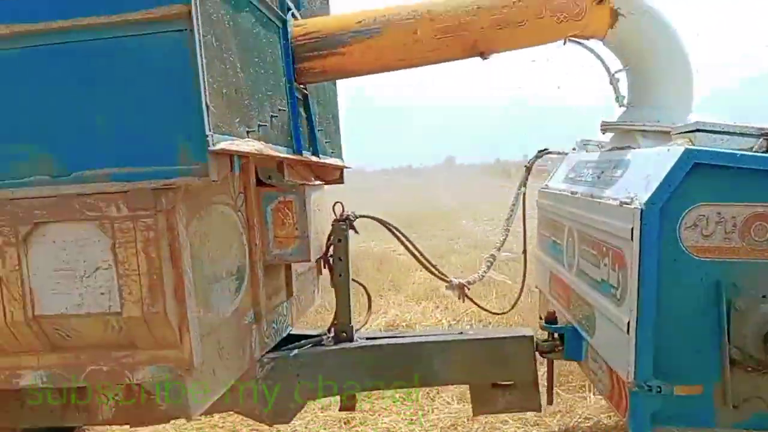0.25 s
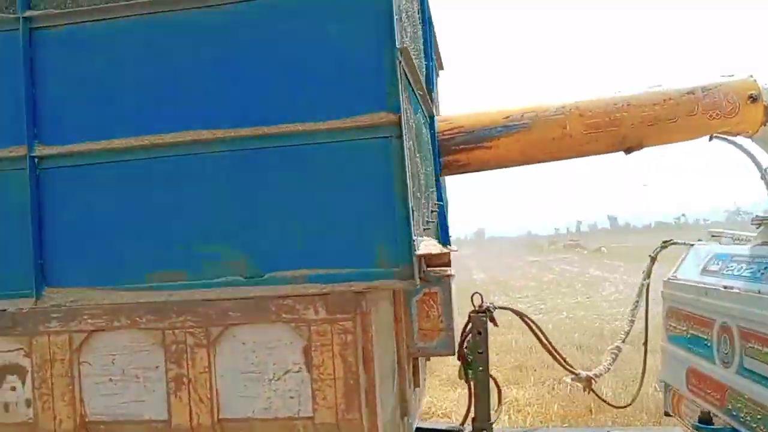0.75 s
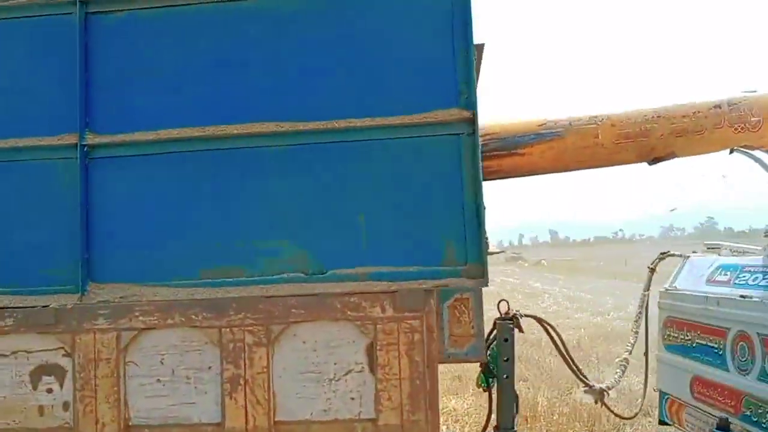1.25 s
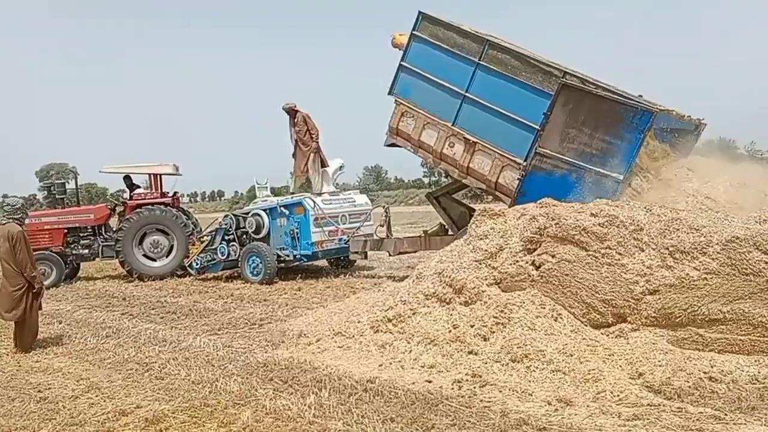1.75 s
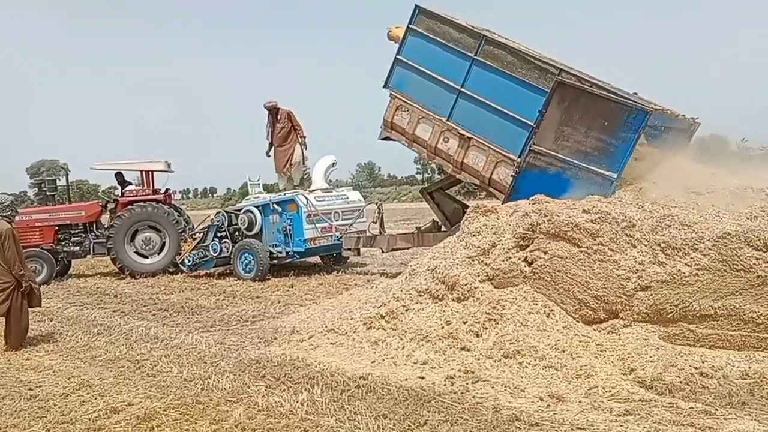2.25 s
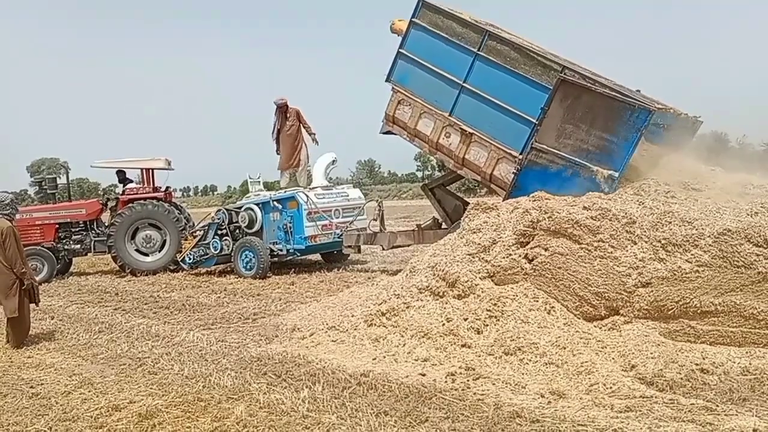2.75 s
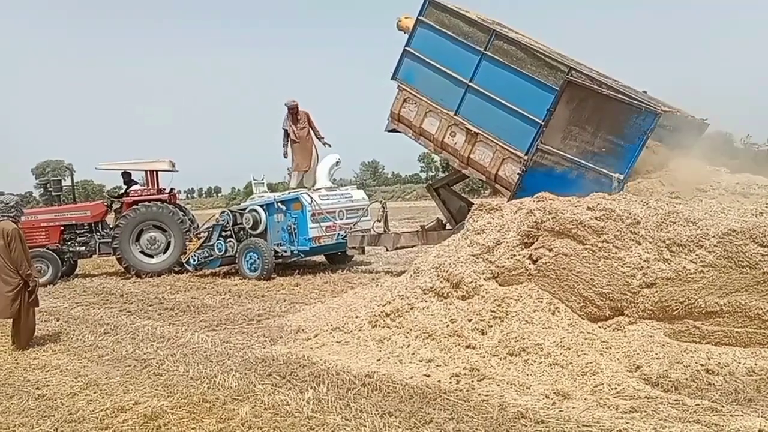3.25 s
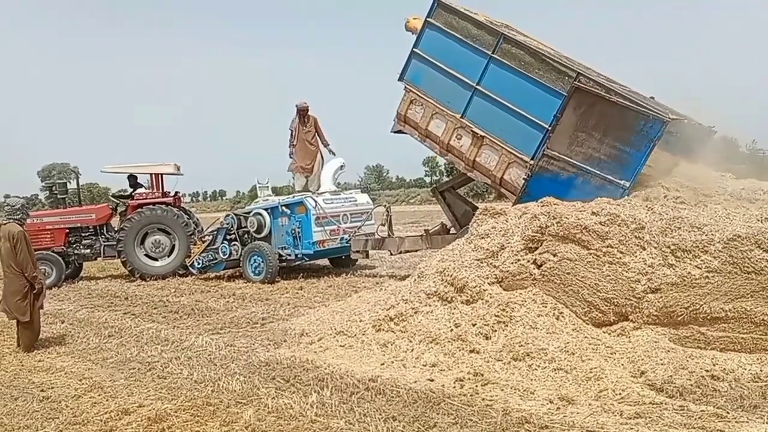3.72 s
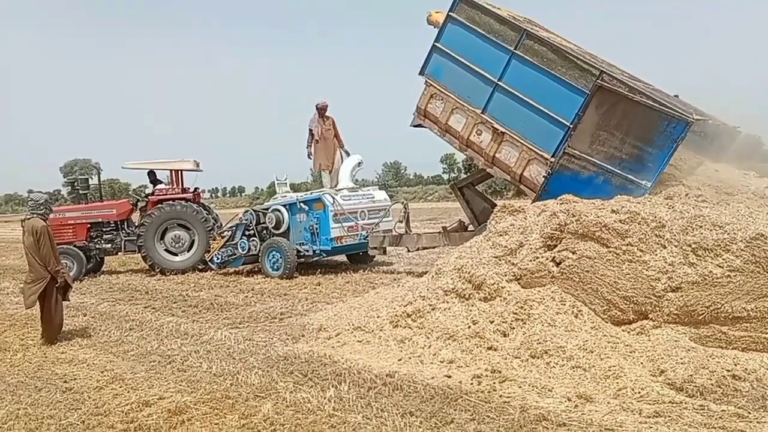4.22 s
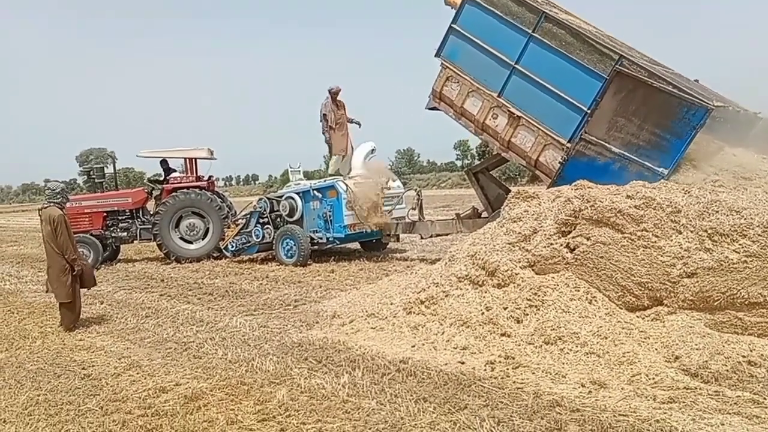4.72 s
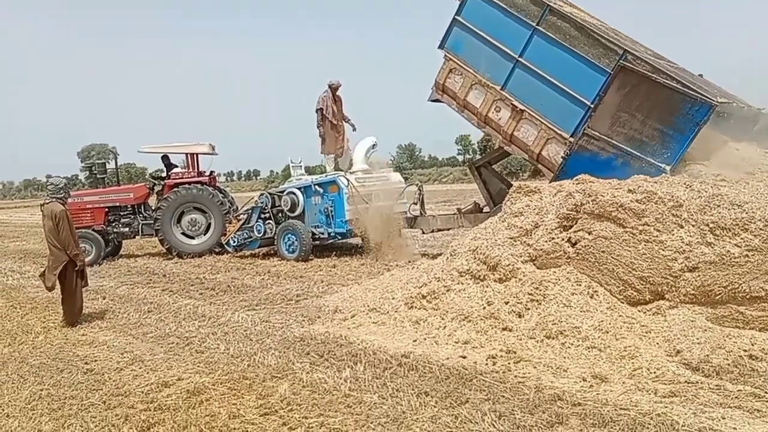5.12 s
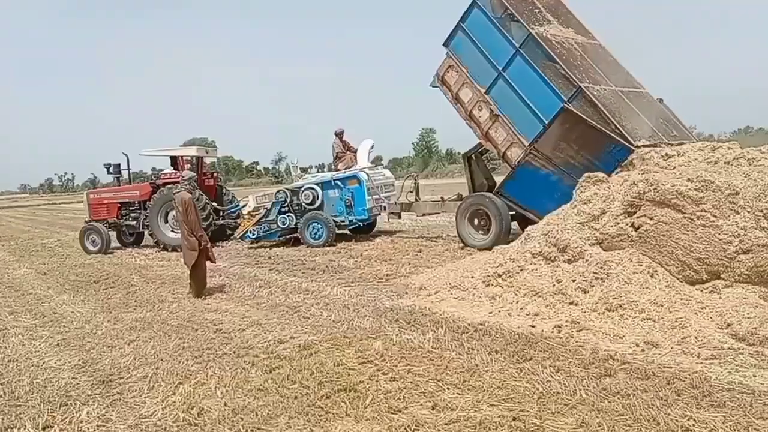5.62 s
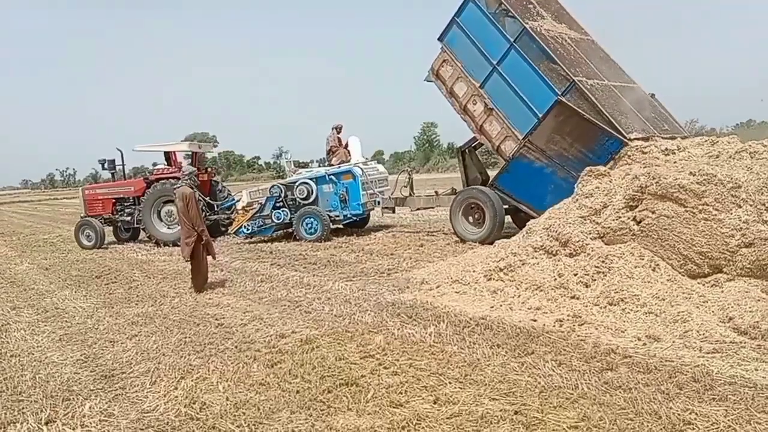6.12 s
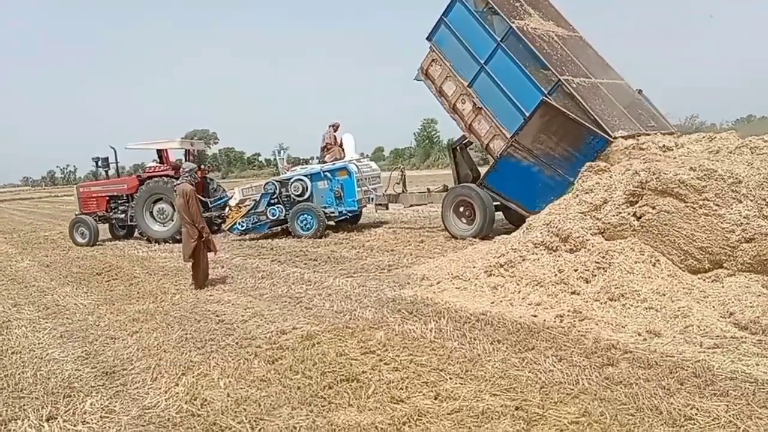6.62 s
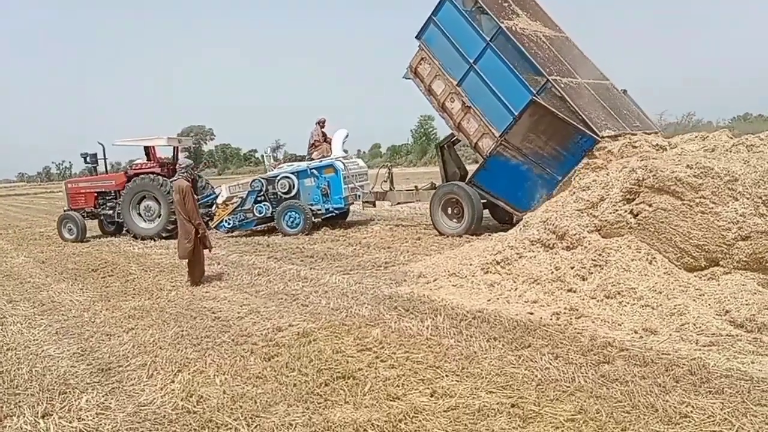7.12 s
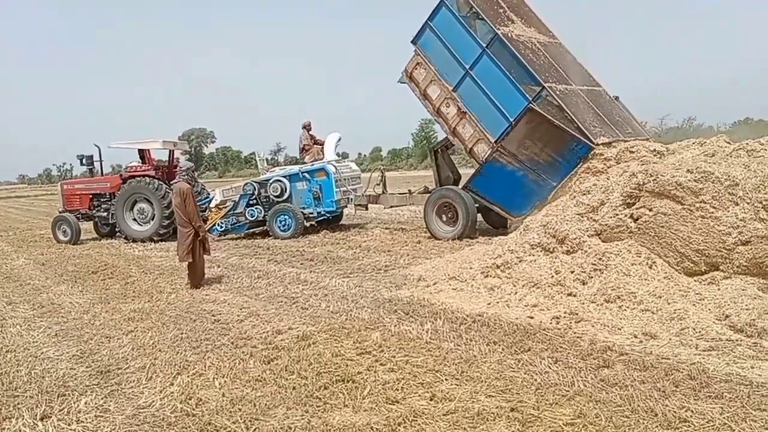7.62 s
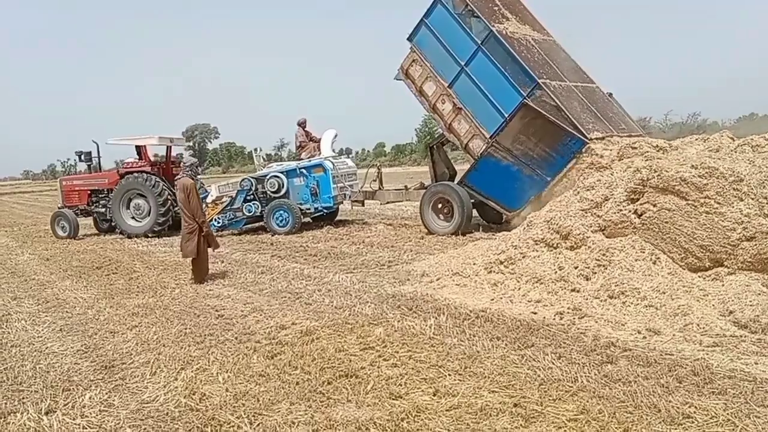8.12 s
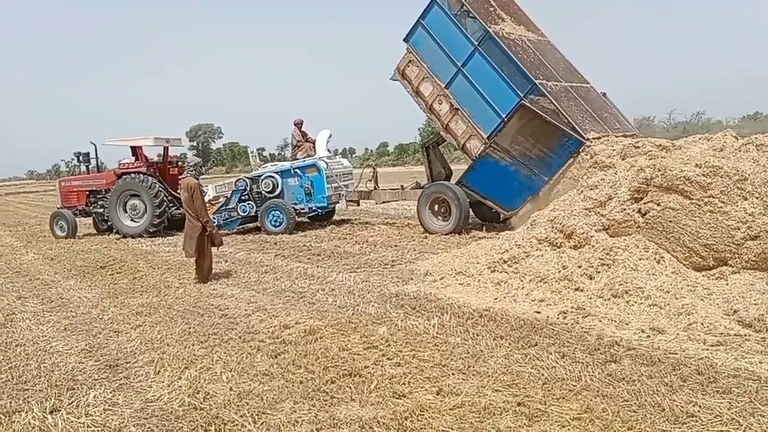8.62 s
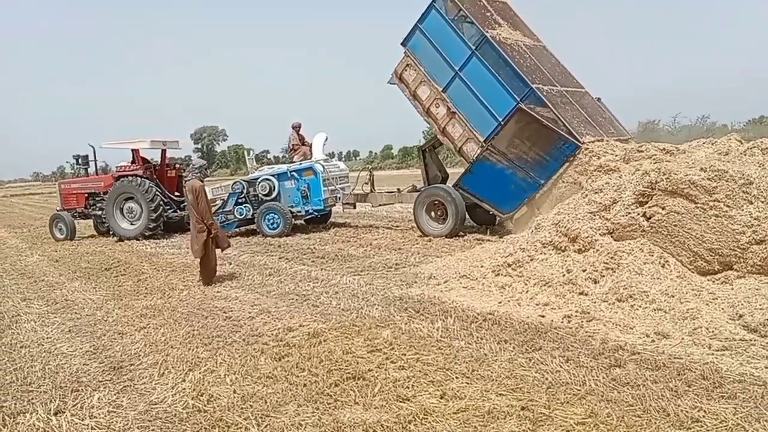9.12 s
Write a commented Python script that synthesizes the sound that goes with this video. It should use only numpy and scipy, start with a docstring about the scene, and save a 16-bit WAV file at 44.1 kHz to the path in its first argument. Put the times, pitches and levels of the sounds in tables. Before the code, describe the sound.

A tractor-driven straw chopper roars close by, then the diesel engine revs across a field with hissing chaff and drops to a distant knocking idle.

```python
"""In a stubble field, a four-cylinder diesel tractor drives a straw chopper, heard from three spots in turn.
Beside the chopper, its drum and blower roar over the engine's drone. From across the field, the engine
is revved three times while chaff hisses out. From further off, it sinks to a knocking idle, and close by
straw rustles and snaps and the breeze puffs. Each firing of a cylinder is a burst of noise; the echo
from the ground cancels some pitches and makes the distant tractor sound hollow."""
import sys
import numpy as np
from scipy import signal
from scipy.fft import rfft, irfft, next_fast_len
from scipy.io import wavfile
from scipy.ndimage import uniform_filter1d, map_coordinates

SR = 44100
rng = np.random.default_rng(int(sys.argv[2]) if len(sys.argv) > 2 else 0)


def int16_out(signal):
    """Quantize to a 16-bit WAV file."""
    q = np.round(np.clip(np.atleast_2d(signal).T, -1, 1) * 32767)
    wavfile.write(sys.argv[1], SR, q.astype(np.int16))


N = 412323

BESIDE_S, REVVING_S, IDLING_S = (0, 1.459), (1.504, 5.622), (5.622, 9.36)  # start and end at each spot
BESIDE_HZ, CRUISE_HZ, IDLE_HZ = 41.3, 75.83, 32  # firing rate: how many cylinders fire each second

# A "colour" says how strong the low and high pitches are compared with each other.
# roar of the drum and blower: f/Hz, level/dB
ROAR_COLOUR = [(38, -32), (57, -20), (82, -6.5), (220, -4), (290, 0.5), (480, -10), (650, 2), (780, -2.5),
               (900, -6.5), (1480, -9.5), (3420, -21.5), (7320, -22.5), (9300, -44.5), (15000, -41.5)]
# ringing of the sheet-metal housing: f/Hz, half width/Hz, level/dB
HOUSING_RINGS = [(2480, 170, 1.5), (4420, 66, 6.5), (6760, 130, 3.5)]
# drone of the exhaust and drive: multiple of the firing rate, level/dB
DRONE_TONES = [(2, -12), (4, -16), (4.43, -18.5), (6, -15.5), (8.14, -20), (12, -29), (14, -22),
               (15.5, -18), (19, -15.5)]

# each time the throttle opens: t/s, coasting before/s, pick-up time/s, overshoot/Hz, load (0 to 1)
THROTTLE_OPENINGS = [(1.35, 0.103, .26, .9, 0), (2.125, .23, .2, 1.9, 0.66), (3.03, .38, .26, .9, 1),
                     (5.03, .33, .27, 1.91, 0.65)]
# rows for rumble, clatter, hiss: level/dB at full speed, rise/dB per Hz of firing rate, load boost/dB
REVVING_LOUDNESS = [(-24, 0.3, .8), (-17.5, 0.34, 4), (-34.5, .35, 3)]
# diesel knock while revving: f/Hz, level/dB
REVVING_KNOCK_COLOUR = [(300, -6), (1200, -2), (2300, 5.5), (3500, -2), (5500, 2.5), (8000, 5.5),
                        (14000, -5.5)]
# the tractor from across the field: f/Hz, level/dB
REVVING_ENGINE_COLOUR = [(30, -41.5), (70, -27.5), (100, -22), (160, -6.5), (215, -9), (300, -11),
                         (480, -15), (950, -2), (1300, -0.5), (2200, -5.5), (3600, -14.5), (7700, -29),
                         (9300, -44), (15000, -52.5)]
# pitches that the ground echo cancels there: f/Hz, half width/Hz, level/dB
REVVING_ECHO_DIPS = [(691, 130, -16), (1760, 294, -14), (2720, 413, -5.5), (4510, 486, -8),
                     (6000, 310, -10.5)]
# note of the exhaust: multiple of the firing rate, level/dB
EXHAUST_TONES = [(1.001, -20), (1.499, -22), (1.75, -19), (2, -11.5), (2.249, -12.5), (3, -11.5),
                 (3.75, -20.5), (5.501, -25), (7, -23)]
# hum of the blower: multiple of the rate at which its blades pass, level/dB
BLOWER_TONES = [(1, -4.5), (4 / 3, -18), (2, -16.5)]
# whine of the gears: multiple of the firing rate, level/dB
GEAR_TONES = [(12.5, -15.5), (13, -16.5), (14.5, -18.5), (15, -21), (15.75, -23.5), (16, -8), (16.5, -19),
              (18, -20), (28, -14.5), (36.5, -25), (44.5, -21)]
# rasp of burning fuel: f/Hz, level/dB
FUEL_RASP_COLOUR = [(700, -31), (1300, 9), (1750, -17), (2350, 3), (3100, -12.5), (4400, -18), (6200, -24),
                    (8000, -6.5), (9300, -33), (15000, -45)]
# chaff leaving the blower: f/Hz, level/dB
CHAFF_COLOUR = [(1700, -23.5), (2400, 6), (2950, 2.5), (3600, 7), (4400, -24), (6100, -17), (6700, -2),
                (7600, -6), (8500, -13), (9400, -27), (15000, -30)]

# the engine slowing to idle: t/s, firing rate/Hz
IDLING_SPEED = [(5.62, 42.55), (5.8, 44.37), (6.0, 42.91), (6.35, 40.34), (6.75, 41.51), (7.05, 41.02),
                (7.25, 38.84), (7.65, 33.28), (7.9, 31.88), (8.33, 33.81), (8.86, 31.3), (9.35, 32.39)]
# rows for rumble, clatter, hiss: level/dB at idle, rise/dB per Hz of firing rate, load boost/dB
IDLING_LOUDNESS = [(-51.5, 1.0, 1.5), (-33.5, 0.416, 1.5), (-47.5, 0.4247, 1.8)]
# diesel knock, fuel injector ticks and exhaust puffs at low speed: f/Hz, level/dB
IDLING_KNOCK_COLOUR = [(300, -8), (1200, -6), (2600, -1), (3800, 1), (5000, -5.5), (9000, -3)]
TICK_COLOUR = [(1000, -12.5), (3500, -7.5), (5500, -6), (9000, 2.5), (14000, 1.5)]
PUFF_COLOUR = [(30, -16), (70, -10), (170, 1), (260, -12.5), (600, -30), (2000, -74)]
# ringing of the engine block: f/Hz, half width/Hz, level/dB
BLOCK_RINGS = [(984, 54, 4), (2730, 73, 2.5), (3610, 260, 2), (4710, 84, 4), (5660, 130, 2.5),
               (6740, 220, 6), (7740, 120, 5), (8470, 120, 6)]
# the tractor from further off: f/Hz, level/dB
IDLING_ENGINE_COLOUR = [(30, -40), (75, -17), (200, -24), (320, -12), (450, -15), (950, -7), (1400, -4.5),
                        (2100, -1.5), (3800, -14), (4900, -26.5), (8300, -37.5), (9300, -47), (13000, -61)]
# pitches that the ground echo cancels there: f/Hz, half width/Hz, level/dB
IDLING_ECHO_DIPS = [(604, 112.5, -31.5), (1620, 203, -16.5), (2224, 475, -10.5), (3186, 360, -9),
                    (4280, 150, -4.5)]
# hum of the exhaust and drive while slowing: multiple of the firing rate, level/dB
IDLING_TONES = [(2, -43.5), (4, -44), (4.199, -47.5), (7.001, -52)]

# loose straw shifting: t/s, level/dB, half length/s
RUSTLE_SWELLS = [(5.72, -38, 0.024), (6.687, -46, 0.1)]
# its swish: f/Hz, level/dB
SWISH_COLOUR = [(2000, -22), (4800, -2), (7000, -6), (8500, 4), (9400, -17), (15000, -28)]
# dry stalks breaking: t/s, peak level/dB
STALK_SNAPS = [(6.639, -26), (6.9744, -35), (7.4485, -30), (7.8114, -35), (8.6214, -37.5), (8.7344, -46),
               (8.9844, -41)]
# their crack: f/Hz, level/dB
CRACK_COLOUR = [(2000, -33), (5000, -8), (6400, -3), (6900, 12), (7400, -9), (8500, -16), (9500, -15),
                (15000, -28)]
# puffs of breeze: t/s, level/dB, half length/s
WIND_PUFFS = [(7.412, -36.5, 0.018), (7.5, -45, 0.026), (7.742, -40.5, 0.033), (7.852, -39.5, 0.038),
              (8.078, -42, 0.12), (8.35, -41, .038), (8.607, -42, 0.036), (8.87, -40.5, 0.059),
              (8.982, -32.5, .035), (9.076, -39.5, .035), (9.317, -40, 0.033)]
# their low rumble: f/Hz, level/dB
WIND_COLOUR = [(30, -18), (75, -1.5), (165, 2), (260, -7.5), (350, -10), (600, -32), (2000, -61)]


def undb(db):
    """Turn decibels into a number to multiply by."""
    return 10 ** (np.asarray(db) / 20)


def unit(x):
    """Scale a sound to an average strength (rms) of 1."""
    return x / np.sqrt(np.mean(x ** 2))


def times(span):
    """The time of every sample between a start and an end."""
    return np.arange(int(span[0] * SR), min(int(span[1] * SR), N)) / SR


def wander(t, per_s):
    """A smooth random curve, about 1 in size, that changes per_s times a second."""
    return map_coordinates(rng.standard_normal(8192), [t * per_s], order=2, mode="wrap")


def colour(x, spectrum, bumps=()):
    """Filter a sound to a colour, with optional rounded peaks and dips; the result has strength 1."""
    size = 2 * next_fast_len(len(x) // 2 + 4096)
    f = np.maximum(np.arange(size // 2 + 1) * SR / size, 1)
    hz, db = np.transpose(spectrum)
    db = np.interp(np.log(f), np.log(hz), db)
    for centre, width, height in bumps:
        db = db + height * np.exp(-((f - centre) / width) ** 2)
    # this folding makes the filter ring only after a hit, never before it
    cepstrum = irfft(np.log(undb(db)))
    cepstrum[1:size // 2] *= 2
    cepstrum[size // 2 + 1:] = 0
    response = np.exp(rfft(cepstrum))
    return unit(irfft(rfft(x, size) * response)[:len(x)])


def three_bands(x):
    """Split a sound into low rumble, middle clatter and high hiss, each of strength 1."""
    filters = (signal.butter(6, hz, fs=SR, output="sos") for hz in (600, 4500))
    lows, below_hiss = (signal.sosfiltfilt(sos, x) for sos in filters)
    return unit(lows), unit(below_hiss - lows), unit(x - below_hiss)


def count_firings(t, hz, wobble):
    """How many firings have gone by; the engine's shaft turns a little unevenly."""
    return np.cumsum(hz * (1 + wobble * wander(t, 40))) / SR


def rattle(firings, hz, blur_hz):
    """Valves and gears repeat a pattern every four firings; above blur_hz, fresh noise takes over."""
    size = int(4 * SR / np.mean(hz))
    pattern = unit(rng.standard_normal(8192)[:size])
    repeating = map_coordinates(pattern, [firings / 4 % 1 * size], order=1, mode="grid-wrap")
    low, high = (signal.butter(1, blur_hz, kind, fs=SR) for kind in ("low", "high"))
    return signal.lfilter(*low, repeating) + signal.lfilter(*high, rng.standard_normal(len(firings)))


def straw_clicks(t, per_s, spread_db):
    """Bits of straw make many tiny hits, some much louder than others."""
    hits = rng.random(len(t)) < per_s / SR
    signs = rng.choice([-1, 1], len(t))
    sizes = undb(spread_db * np.minimum(rng.exponential(size=len(t)), 4))
    return unit(hits * signs * sizes)


def tones(t, cycles, table, waver_db):
    """Pure tones that follow a turning shaft, each wavering in loudness."""
    out = np.zeros(len(t))
    for multiple, db in table:
        gain = np.sqrt(2) * undb(db + waver_db * wander(t, 9))
        out += gain * np.sin(2 * np.pi * (multiple * cycles + rng.random()))
    return out


def beside_chopper(t):
    """The drum and blower roar over the engine's drone while chaff strikes the metal pipe."""
    rumble_db, clatter_db, hiss_db = (db - 0.5 * wander(t, 7.6) for db in (-20.5, -21.5, -34.5))
    firings = count_firings(t, BESIDE_HZ, wobble=0.00487)
    shaking = rattle(firings, BESIDE_HZ, blur_hz=990)
    shaking += undb(-6) * straw_clicks(t, per_s=3000, spread_db=3.5)
    rumble, clatter, hiss = three_bands(colour(shaking, ROAR_COLOUR, HOUSING_RINGS))
    low = undb(-1) * rumble + tones(t, firings, DRONE_TONES, waver_db=4)
    boom_db = np.minimum(-31 + 5.5 * t, -24)  # the tone at three times the firing rate swells
    boom = undb(boom_db) * tones(t, firings, [(3, 0)], waver_db=1)
    hiss_db += 0.6 * wander(t, 33.6)  # the treble flickers
    return undb(rumble_db) * low + boom + undb(clatter_db) * clatter + undb(hiss_db) * hiss


def speed_and_load(t, sag_hz_per_s=23.6, attack_s=0.023, release_s=0.18, flywheel_s=0.074):
    """The engine coasts down, gets a surge of fuel (the load), speeds up and overshoots a little."""
    hz, load = np.full(len(t), CRUISE_HZ), 0
    for opens, coasting, pickup, overshoot_hz, strength in THROTTLE_OPENINGS:
        since = t - opens
        sag = np.interp(since, [-coasting, 0, pickup], [0, sag_hz_per_s * coasting, 0])
        overshoot = overshoot_hz * np.exp(-((since - pickup - 0.1376) / 0.12) ** 2)
        hz = hz - sag + overshoot
        fading = (pickup - since) / release_s + 0.34  # about a third is left on reaching full speed
        load = load + strength * np.clip(np.minimum(since / attack_s, fading), 0, 1)
    return uniform_filter1d(hz, size=int(flywheel_s * SR)), load  # the heavy flywheel smooths changes


def engine_levels(table, faster_hz, load):
    """Rumble, clatter and hiss each grow louder with speed and load; levels in dB."""
    return [db + db_per_hz * faster_hz + load_db * load for db, db_per_hz, load_db in table]


def bursts(firings, hz, decay_s, scatter_db, uneven_db):
    """A sharp burst of noise at each firing; uneven_db makes one of the four cylinders hit hardest."""
    number = np.floor(firings).astype(int)
    level_db = scatter_db * rng.standard_normal(1024)[number] + uneven_db * np.cos(number * np.pi / 2)
    age_s = (firings % 1) / hz
    return unit(undb(level_db) * np.exp(-age_s / decay_s) * rng.standard_normal(len(firings)))


def revving_tractor(t, blades_per_firing=4.2):
    """The engine sags and picks up again; each surge of fuel makes it knock harder and rasp."""
    hz, load = speed_and_load(t)
    rumble_db, clatter_db, hiss_db = engine_levels(REVVING_LOUDNESS, np.minimum(hz - CRUISE_HZ, 0), load)
    firings = count_firings(t, hz, wobble=0.0013)
    bangs = bursts(firings, hz, decay_s=0.0069, scatter_db=1.8, uneven_db=1)
    knock = colour(bangs, REVVING_KNOCK_COLOUR)
    hardness = undb(-6.5 + 5.2 * load)
    # the blower's rush of air blurs the engine's pattern
    body = unit(rattle(firings, hz, blur_hz=1480) + undb(-3.5) * rng.standard_normal(len(t)))
    shaking = (body + hardness * knock) / np.sqrt(1 + hardness ** 2)
    rumble, clatter, hiss = three_bands(colour(shaking, REVVING_ENGINE_COLOUR, REVVING_ECHO_DIPS))
    exhaust = tones(t, firings, EXHAUST_TONES, waver_db=1.5)
    blower = tones(t, blades_per_firing * firings, BLOWER_TONES, waver_db=-0.5)
    # the gears whine most clearly at full, steady speed
    whine = (hz / hz.max()) ** 3 * (1 - 0.52 * load) * tones(t, firings, GEAR_TONES, waver_db=2.5)
    burning = bursts(firings, hz, decay_s=0.01, scatter_db=2.5, uneven_db=0)
    rasp = undb(-22.5) * load * colour(burning, FUEL_RASP_COLOUR)
    hiss_db -= 5.5 * np.maximum(t - 4.56, 0)  # the sound dulls towards the end
    low = undb(rumble_db) * (undb(-3.5) * rumble + exhaust + blower)
    middle = undb(clatter_db) * (undb(-0.9) * clatter + whine)
    return low + middle + undb(hiss_db) * hiss + rasp


def chaff_spray(t, start_s=3.25, swell_s=2.08, fade_s=0.66):
    """A cloud of chaff hisses out of the blower, swelling and then thinning away."""
    flow = np.interp(t - start_s, [0, swell_s, swell_s + fade_s], [0, 1, 0])
    return undb(-26) * flow * colour(straw_clicks(t, per_s=4700, spread_db=3.5), CHAFF_COLOUR)


def idling_tractor(t, full_load_hz_per_s=4.5):
    """Slow enough to hear single firings: a fuel injector ticks, then its cylinder knocks."""
    hz = np.interp(t, *np.transpose(IDLING_SPEED))
    speeding_up = uniform_filter1d(np.gradient(hz) * SR, size=6000)
    load = np.clip(speeding_up / full_load_hz_per_s, 0, 1)
    rumble_db, clatter_db, hiss_db = engine_levels(IDLING_LOUDNESS, hz - IDLE_HZ, load)
    firings = count_firings(t, hz, wobble=0.004)
    bangs = bursts(firings, hz, decay_s=0.0079, scatter_db=1.4, uneven_db=-0.1)
    knock_db = -5 + 0.3 * (hz - IDLE_HZ)  # the knock stands out more at higher speed
    knock = undb(knock_db) * colour(bangs, IDLING_KNOCK_COLOUR, BLOCK_RINGS)
    injections = bursts(firings + 0.26, hz, decay_s=0.0035, scatter_db=4, uneven_db=2)
    ticks = undb(0.5) * colour(injections, TICK_COLOUR)
    shaking = rattle(firings, hz, blur_hz=586) + knock + ticks
    engine = colour(shaking, IDLING_ENGINE_COLOUR, [*IDLING_ECHO_DIPS, *BLOCK_RINGS])
    rumble, clatter, hiss = three_bands(engine)
    puffing = undb(-41) * colour(rng.standard_normal(len(t)), PUFF_COLOUR)
    hum = tones(t, firings, IDLING_TONES, waver_db=3)
    exhaust = np.minimum(hz / 40, 1) ** 12 * (puffing + hum)  # dies away below 40 firings a second
    return exhaust + undb(rumble_db) * rumble + undb(clatter_db) * clatter + undb(hiss_db) * hiss


def swells(t, table):
    """A loudness curve with one short, rounded rise and fall for each row."""
    return sum(undb(db) * np.exp(-((t - peak_s) / half_s) ** 2) for peak_s, db, half_s in table)


def straw_rustle(t):
    """Loose straw shifts in short, crackling swishes."""
    return swells(t, RUSTLE_SWELLS) * colour(straw_clicks(t, per_s=2400, spread_db=2.5), SWISH_COLOUR)


def straw_snaps(decay_s=0.0058):
    """Dry stalks break, each with a short, bright crack."""
    t, out = np.arange(2048) / SR, np.zeros(N)
    for at_s, db in STALK_SNAPS:
        crack = colour(rng.standard_normal(len(t)) * np.exp(-t / decay_s), CRACK_COLOUR)
        start = int(at_s * SR)
        out[start:start + len(t)] += undb(db) * crack / np.abs(crack).max()
    return out


def wind(t):
    """The breeze arrives in short puffs of low noise."""
    return swells(t, WIND_PUFFS) * colour(rng.standard_normal(N), WIND_COLOUR)


def scene():
    """The three spots follow each other abruptly, with an instant of silence after the first."""
    t = np.arange(N) / SR
    out = wind(t) + straw_snaps() + straw_rustle(t)
    beside = beside_chopper(times(BESIDE_S))
    across = revving_tractor(times(REVVING_S)) + chaff_spray(times(REVVING_S))
    far = idling_tractor(times(IDLING_S))
    for span, sound in ((BESIDE_S, beside), (REVVING_S, across), (IDLING_S, far)):
        start = int(span[0] * SR)
        out[start:start + len(sound)] += sound
    return out[None]


def record(dry):
    """Cut away the highest treble, above 15600 Hz."""
    return signal.sosfilt(signal.ellip(14, 0.2, 80, 15600, fs=SR, output="sos"), dry)


dry = scene()
out = record(dry)
int16_out(out)
```